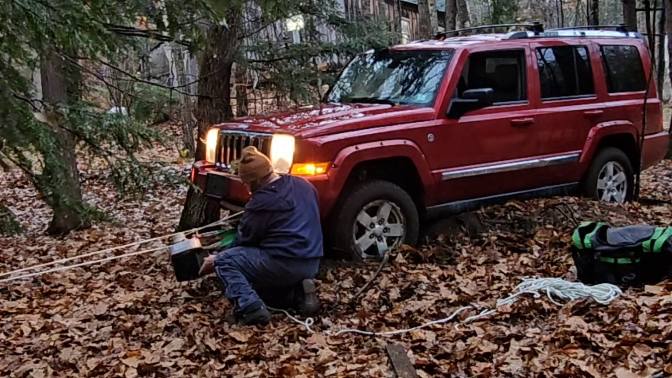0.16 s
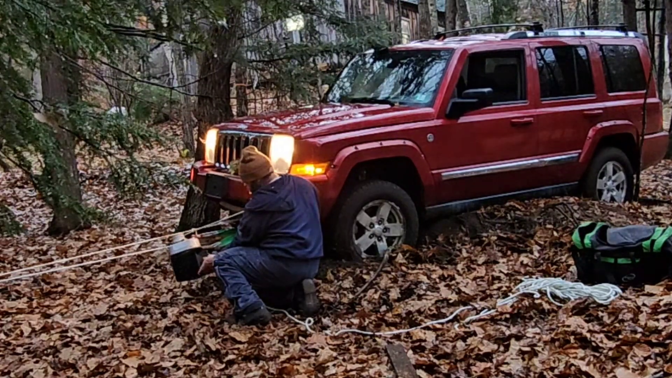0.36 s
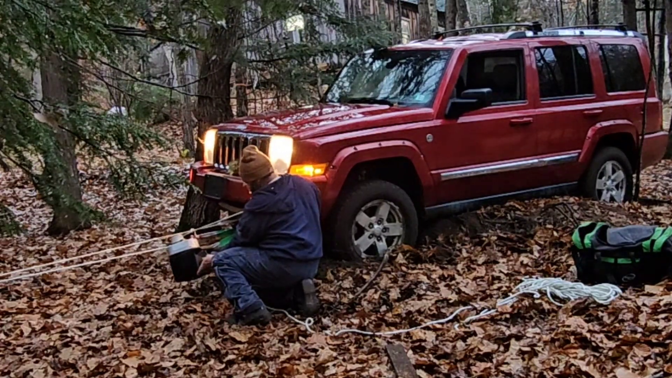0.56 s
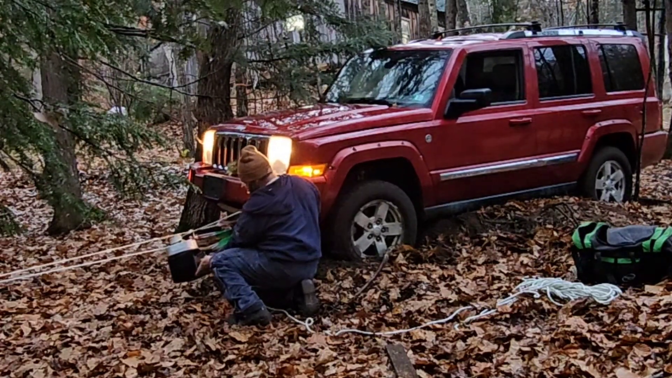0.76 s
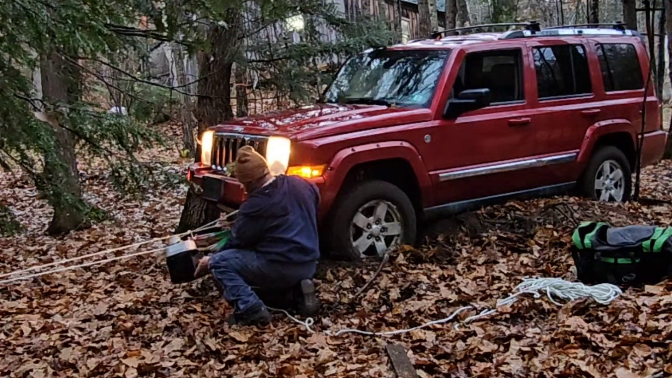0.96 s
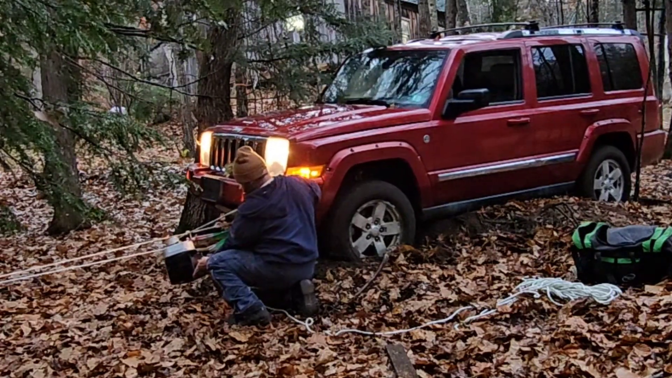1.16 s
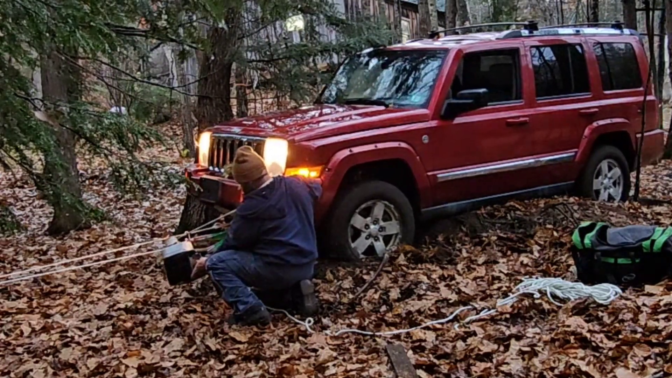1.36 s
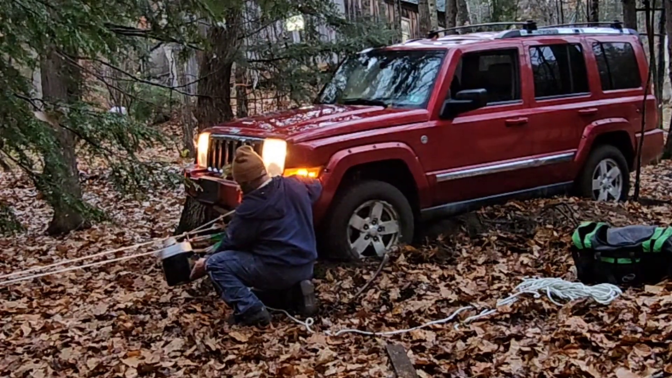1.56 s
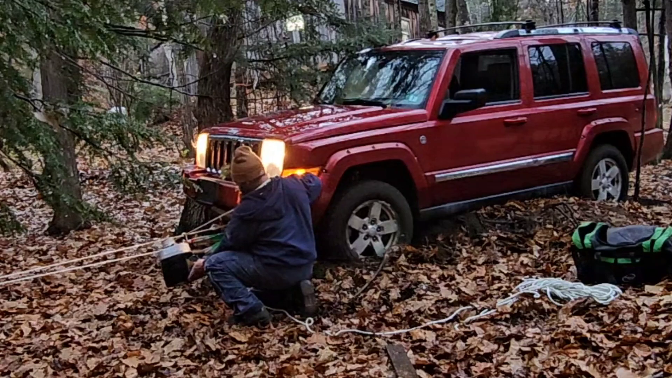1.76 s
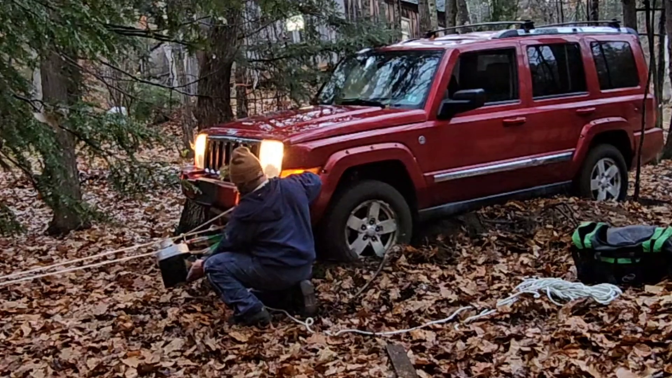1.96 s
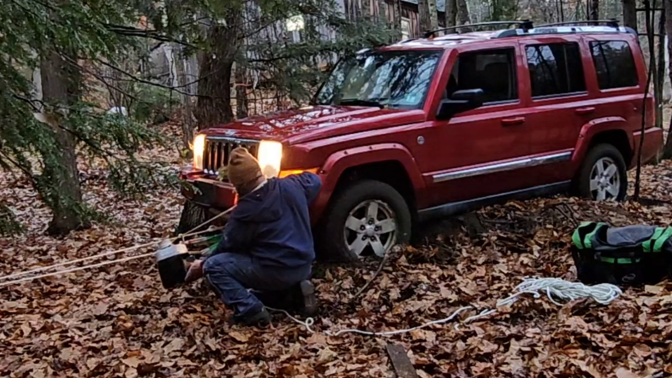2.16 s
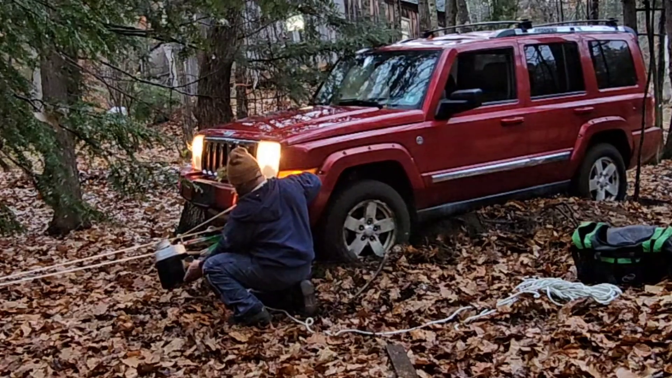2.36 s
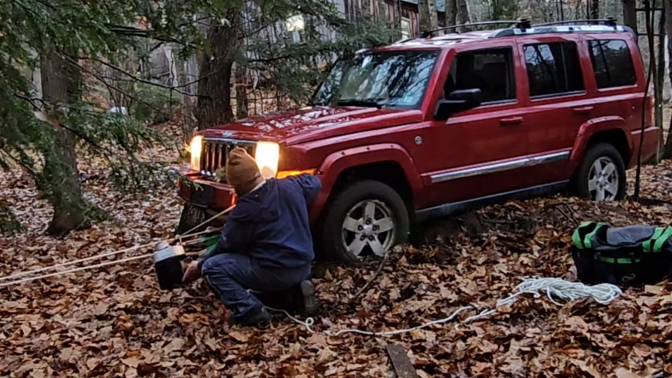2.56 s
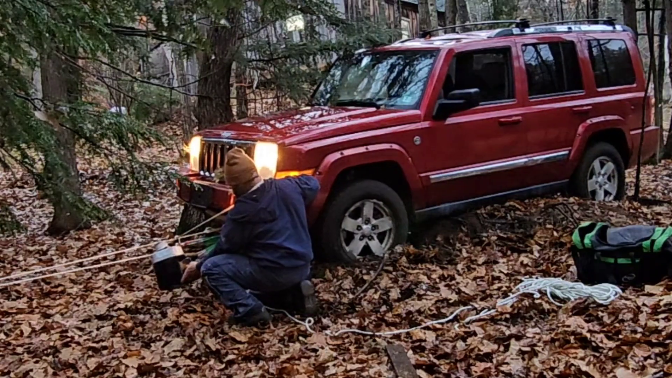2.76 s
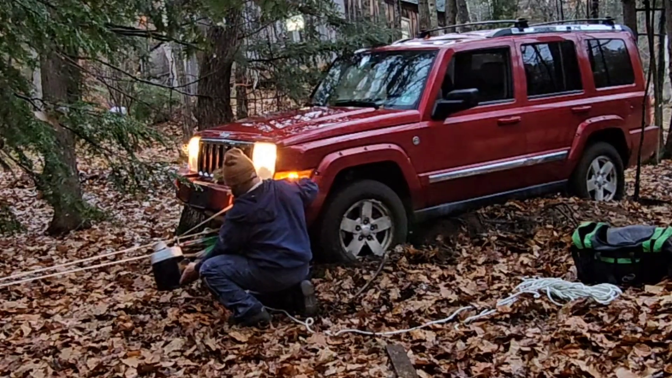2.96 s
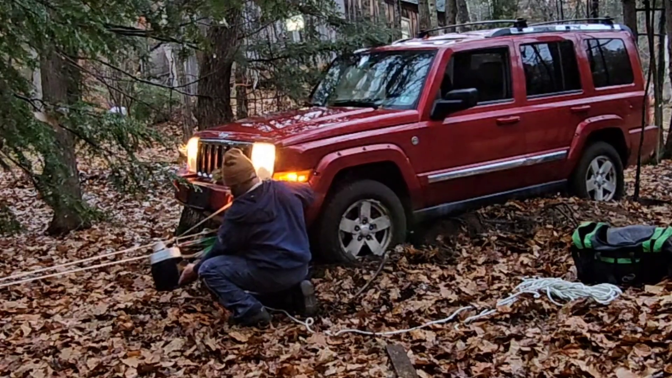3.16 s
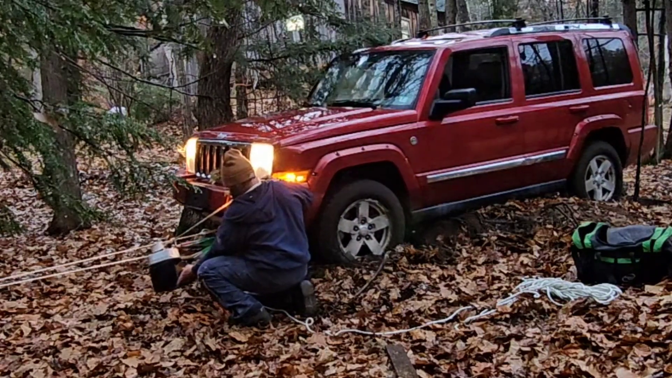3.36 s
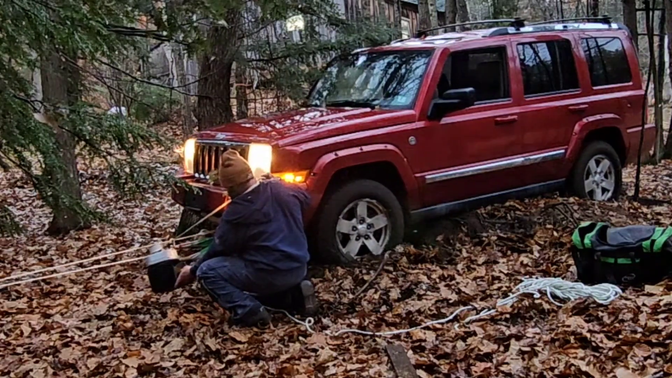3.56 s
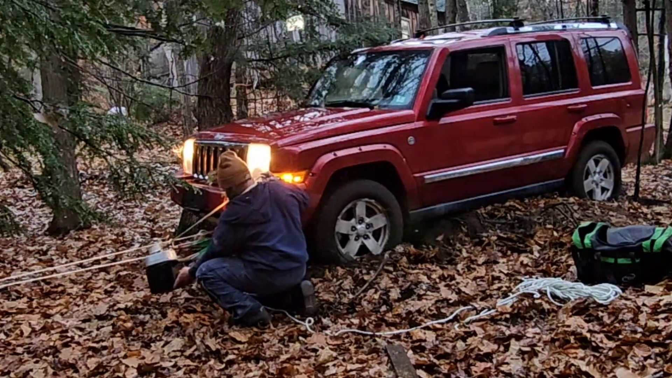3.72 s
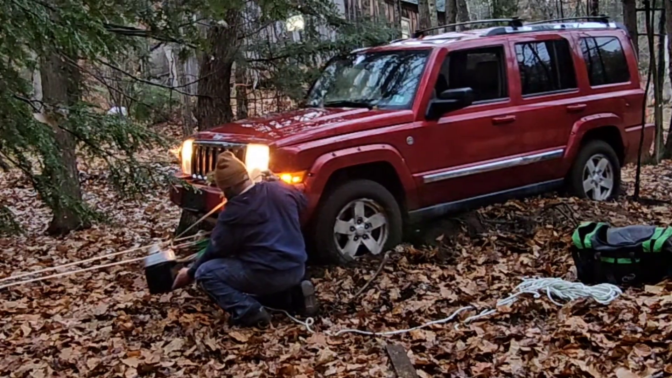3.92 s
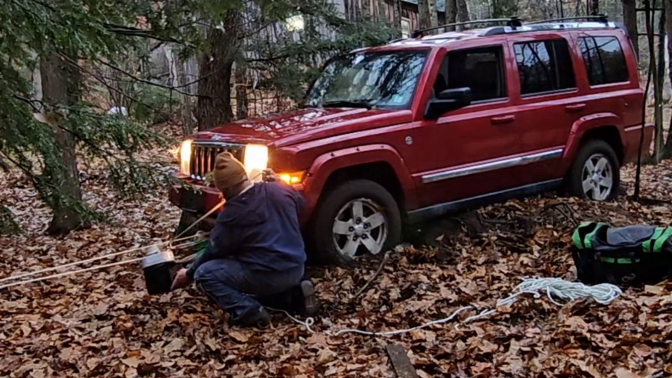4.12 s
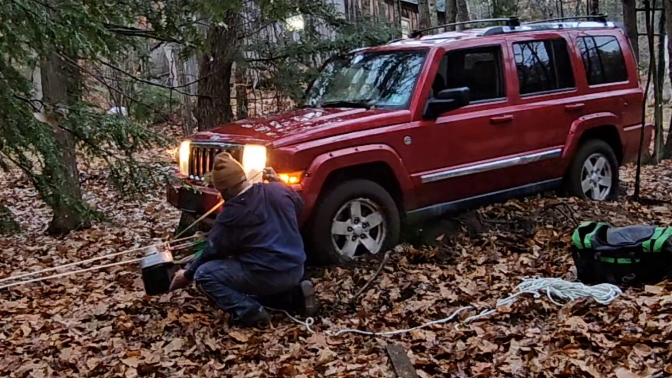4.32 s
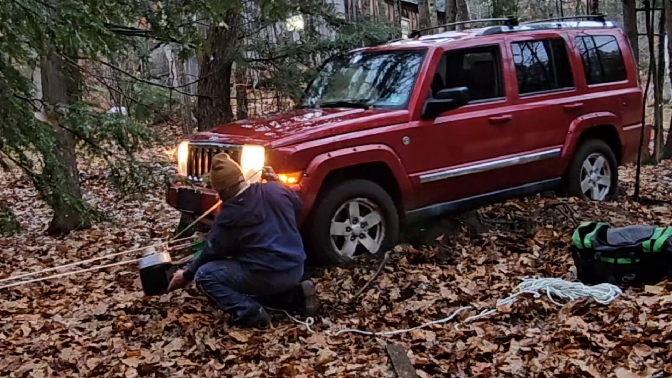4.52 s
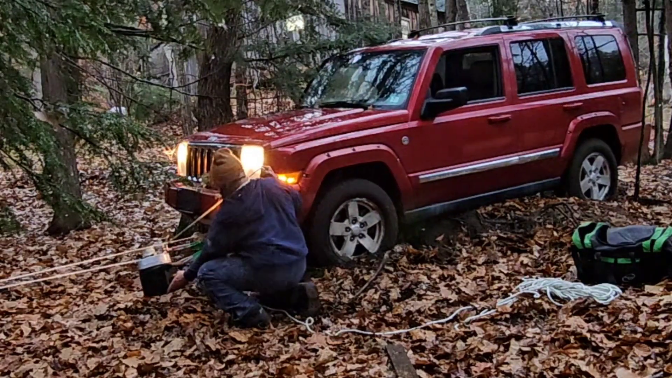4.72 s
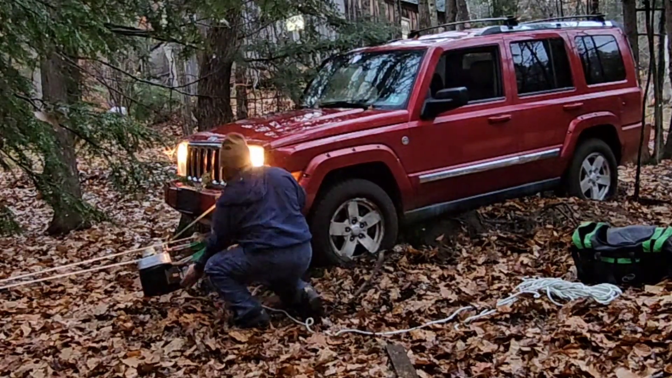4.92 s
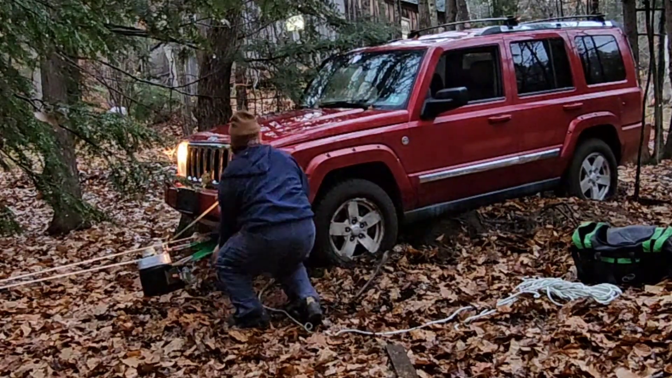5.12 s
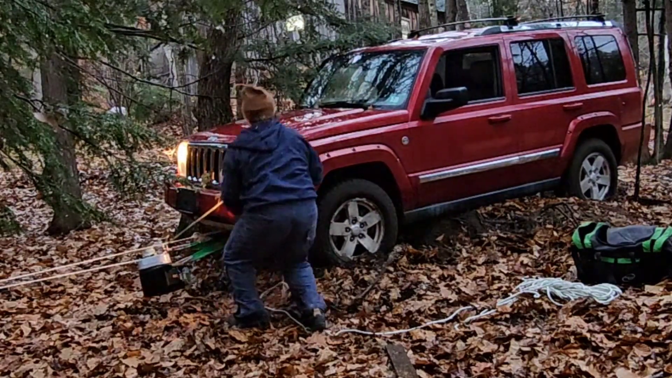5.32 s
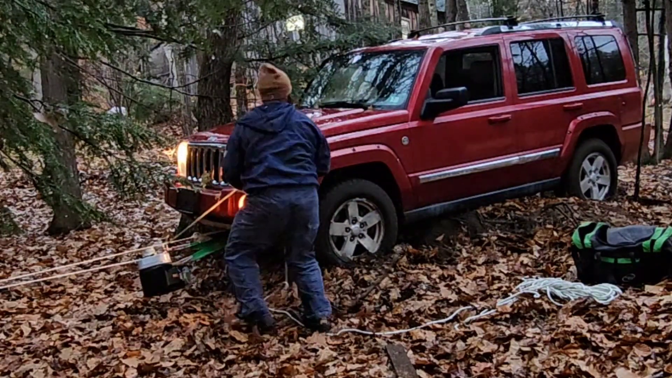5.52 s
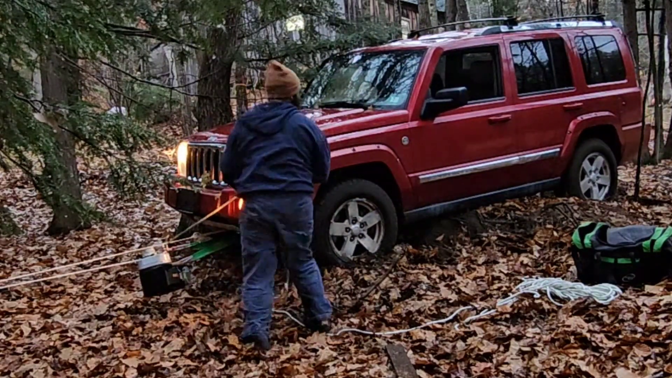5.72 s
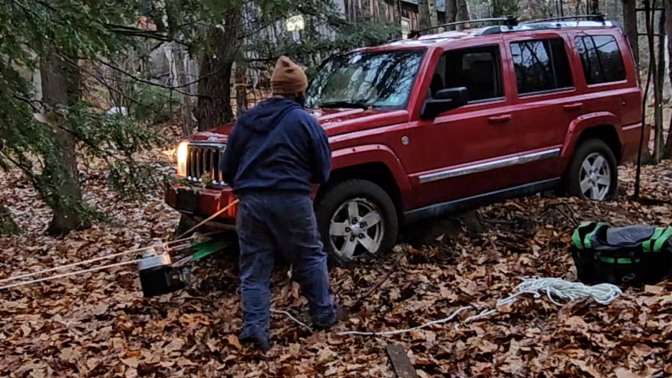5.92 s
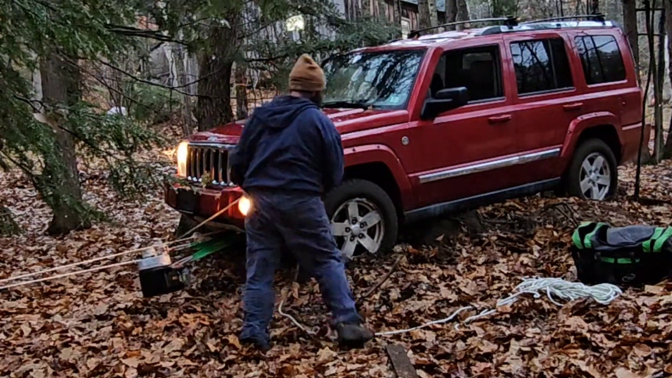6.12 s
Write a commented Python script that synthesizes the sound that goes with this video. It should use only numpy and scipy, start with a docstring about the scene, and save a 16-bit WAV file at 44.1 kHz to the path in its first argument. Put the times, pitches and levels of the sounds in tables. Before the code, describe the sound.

In a wood, an electric rope winch runs close by and a little to the left, with a steady whine and a rough, hissing whirr. A car idles underneath, and there are occasional twig snaps and dull bumps. About two thirds of the way through, the winch cuts off and its gears rattle briefly. Clothes rustle and boots crunch on dry leaves while the engine idles on.

```python
"""A battery capstan winch hauls rope in a wood, a little to the left, beside an idling V8 car.
Its motor sings on orders of its shaft, a gear shaft and its switching drive, over brush noise;
the car adds exhaust orders, rumble and fan rush. Twigs snap now and then; four dull bumps sound.
Near 4.45 s power is cut and the gears rattle out. A man gets up and steps on dry leaves
while the car idles on."""
import sys
import numpy as np
from scipy import signal
from scipy.fft import rfft, irfft, next_fast_len
from scipy.io import wavfile
from scipy.ndimage import uniform_filter1d, map_coordinates

SR = 44100
rng = np.random.default_rng(int(sys.argv[2]) if len(sys.argv) > 2 else 0)


def transcribe(u):
    """Save the signal u as a 16-bit wav file named by the first command-line argument.

    u: samples, shape (n,) or (channels, n), limited to [-1, 1]; the rate is SR.
    q: integer samples, one column per channel.
    """
    v = np.clip(np.atleast_2d(u).T, -1, 1)
    q = np.round(v * 32767).astype(np.int16)
    wavfile.write(sys.argv[1], SR, q)


N = 277149
T = np.arange(N) / SR
RIGHT = np.array([[0], [1]])  # right channel only; pan is left minus right

# shaft speeds up as the rope slackens: (time [s], speed [turns/s])
SHAFT_SPEED = [(0, 197.6), (.17, 199.3), (.55, 201.5), (.65, 202.4), (.8, 202.92), (2.8, 202.87),
               (3.07, 202.55), (3.4, 202.95), (4, 202.8), (4.455, 203.3), (4.5, 197)]
# motor still gathering speed: (time [s], share [0-1])
RUN_UP = [(.5, 1), (.62, 0)]
# strongest shaft orders: (order, pan [dB], right lag [cycles])
MAIN_ORDERS = [(5, -1, 0), (6, 5, 0), (7, 4, 0), (20, -1, -.16), (21, 0, -.12), (25, 0, 0), (28, 2, 0),
               (31.5, 9, 0), (42, 14, -.15)]
# one row per main order: (mid-haul level [dB], run-up change [dB], trend [dB/s])
MAIN_LEVELS = [(-44, -2.5, -0.5), (-51, 2, 1.2), (-48.5, -1, -1.96), (-55.5, 5, 0.5), (-55, 1.5, -0.5),
               (-62, -3, 0.8), (-59.5, -13, -1.5), (-71, 5.5, -1), (-78.5, 10.5, 1)]
# weaker shaft orders: (order, level [dB], pan [dB], run-up change [dB])
WEAK_ORDERS = [(1, -61, 2, 0), (1.5, -64, 2, 0), (3, -69, 3, 0), (4.5, -66, 2, 0), (6.6, -62, 2, 0),
               (7.5, -59.5, 3, -4), (8, -62, 2, -5), (8.5, -60, 2, 0), (8.79, -67, -4, 3), (9, -64, 1, 7),
               (10, -62.5, 4, 6), (11.12, -71, 9, 0), (12, -65, 8, -3), (14, -68, 5, 0), (15, -67, 8, 0),
               (15.54, -72, 6, 0), (17.5, -69, 0, 0), (19, -61, -1, -4), (20.41, -70, 0, 0),
               (21.5, -71, 0, 0), (21.63, -70, 0, 0), (22, -62, -5, -1), (22.8, -71, -4, 0),
               (23, -70, -4, 0), (24, -67, -1, 0), (25.85, -76, 0, 0), (26, -70, 1, -3), (27, -75, 2, 2),
               (27.36, -75, 2, 0), (29, -71, 5, -5), (30, -67, 7, -2), (30.89, -75, 10, 0),
               (31, -75, 10, -1), (34, -85, 10, 4), (35, -75, 12, 3), (40, -80, 8, 0), (45, -85, 9, 0),
               (49, -77, 4, 1), (50, -82, 3, 0), (56, -83, -6, 0), (60, -88, -2, 0), (65, -84, -7, 0),
               (68, -92, -3, 0), (70, -85, -3, 0)]
# gear shaft orders: (order, level [dB], pan [dB], run-up change [dB])
GEAR_ORDERS = [(3, -62, 1, 8), (7, -61, 9, 5), (8, -57, 2, -2), (9, -57.5, 3, 1), (10, -53.5, 1, -8),
               (11, -58, 0, 2), (12, -66, 2, 8), (13, -65, 8, 3), (14, -68, 6, 6), (16, -72, 6, 2),
               (17, -72, 5, 0)]
# passing changes: (order, time [s], half width [s], gain [dB], pan [dB], right lag [cycles])
ORDER_WAVERS = [(5, .5, .1, -9, 0, 0), (5, .72, .1, 2, 0, 0), (6, .35, .08, 6, 0, 0),
                (6, 1.7, .35, -5, 0, 0), (7, .3, .15, 2, 0, 0), (7, .52, .1, -2, 0, 0),
                (15, .12, .2, 4, 0, -.35), (15, .7, .45, 2, -10, 0), (15, 1.6, .2, 4, 0, 0),
                (15, 3.6, 1.3, 0, 0, .3), (15, 3.9, .25, 4, 0, 0), (19, 2.2, 3, 0, 0, -.06),
                (20, .2, .2, 0, 9, 0), (20, .38, .15, -8, 0, 0), (20, 1, .4, 0, -5, -.08),
                (20, 1.6, .25, -4, -7, -.3), (20, 3.5, .5, 1, 0, .16), (20, 4.2, .4, -3, -8, 0),
                (21, .1, .12, 5, -3, -.12), (21, .28, .13, 0, -11, 0), (21, .72, .12, 1, 8, 0),
                (21, 1.7, .3, 3, 6, .1), (21, 2.45, .2, -3, 13, .1), (21, 2.8, .2, -3, 3, -.28),
                (21, 3.1, .45, -8, 0, 0), (22, .1, .2, -6, 4, 0), (22, 2.5, .45, -8, -5, .15),
                (22, 3.4, .25, -4, 0, 0), (23, .7, .25, -3, 0, 0), (23, 2.2, .4, 3, 0, .1),
                (24, 1.3, .35, 0, -8, 0), (24, 1.85, .2, 4, 0, 0), (24, 2.1, 1.6, 0, 0, .33),
                (24, 2.2, .2, 0, 7, 0), (24, 4.1, .7, -6, 0, 0), (25, .1, .15, -1, 9, .3),
                (25, .5, .1, 0, 0, -.2), (25, 1, .35, 3, -7, 0), (25, 2.9, .5, 0, 6, 0),
                (25, 3.5, .6, 0, 0, .22), (25, 3.9, .15, 0, -5, 0), (28, .08, .07, 6, 0, 0),
                (28, 2.7, .55, -3, 2, 0), (28, 3.1, .8, 0, 0, .2), (28, 3.6, .25, 1, 0, 0),
                (28, 4.1, .45, 0, -6, 0), (30, .05, .1, 6, 0, 0), (30, .6, .45, -5, 0, .2),
                (30, 2.1, .5, 3, 0, 0), (30, 2.8, .2, 0, 6, .25), (30, 4.2, .45, -8, -8, 0),
                (31.5, .54, .1, 3, 0, 0), (31.5, 1.5, .3, 0, -13, -.2), (31.5, 2.15, .2, 5, 0, -.15),
                (31.5, 2.8, .5, 0, 9, 0), (31.5, 4.15, .4, -7, 0, 0), (35, .3, .09, -6, 0, 0),
                (42, 2.1, .8, 6, 0, 0), (42, 4.3, .3, -5, 0, 0)]
# switching tone, sidebands: (offset [7 shaft orders], level [dB], pan [dB], right lead [cycles])
DRIVE_TONES = [(-5, -75, 1, 0), (-4, -80, 12, .14), (-3, -84, 14, .14), (-2, -79, 7, .24),
               (-1, -77.5, -8, .28), (0, -78, -3, .55), (1, -77, -5, .19)]
# power cut, scaled per tone: (time [s], base gain [dB])
POWER_CUT = [(4.43, 0), (4.455, 1), (4.473, -3), (4.49, -22), (4.56, -45)]
# brush noise under load: (time [s], level [dB])
BRUSH_LEVEL = [(0.0, -41.5), (0.6, -39.5), (1.25, -39.5), (4.33, -41), (4.44, -40.5)]
# brush noise through the casing: (frequency [Hz], relative density [dB])
BRUSH_SPECTRUM = [(300, -22), (600, -24), (950, -13.5), (1090, -14.5), (1340, -8), (1385, -5.5),
                  (1420, -12.5), (1458, -6.5), (1510, -11), (1650, -10), (1900, -13.5), (2250, -15),
                  (2600, -24), (3050, -15.5), (3500, -17.5), (4400, -16), (5100, -19.5), (6100, -19),
                  (7800, -36), (9600, -30.5), (10600, -47), (11300, -27.5), (12200, -42), (14200, -36),
                  (15500, -76)]
# winch noise: (frequency [Hz], left-right likeness [0-1])
WINCH_LIKENESS = [(500, .84), (1700, .55), (2300, .85), (6000, .72), (6900, .35), (8500, .1), (11000, .1),
                  (12000, .5), (14000, .2)]
# coast-down, hiss dies first: (time [s], body gain [dB], hiss gain [dB])
COAST_GAINS = [(4.43, -4.5, -13), (4.47, -4, -17), (4.5, -1.5, -16), (4.57, -8, -25.5), (4.68, -9.5, -32),
               (4.85, -12, -45)]
# slow gear's scuff: (frequency [Hz], relative density [dB])
SCUFF_SPECTRUM = [(2900, -27), (3300, -8), (3520, 12), (3750, -8), (4400, 1), (4800, 0), (5300, -8),
                  (5700, -10), (6200, -4), (7200, -7), (8500, -33), (10000, -120)]

# idle: (time [s], firing rate [Hz])
FIRING_RATE = [(0, 168.2), (1, 167), (2.1, 167), (2.4, 170), (2.75, 174), (4.1, 174.2), (4.4, 172),
               (4.7, 169), (5.2, 168.7), (6.28, 168)]
# exhaust: (crank order, relative level [dB])
EXHAUST_ORDERS = [(0.5, -32), (1, -9), (1.5, -5), (2, -1), (2.5, -13.5), (3, -3), (3.5, -16.5), (4, 0),
                  (4.5, -22), (5, -16), (5.5, -15.5), (6, -12.5), (6.5, -16.5), (7, -26)]
# engine rumble: (frequency [Hz], relative density [dB])
RUMBLE_SPECTRUM = [(12, -11), (25, -10), (45, 2.5), (75, 1), (110, -2), (200, -12), (320, -19.5),
                   (700, -120)]
# rumble swells: (time [s], half width [s], rise [dB])
RUMBLE_SWELLS = [(1.55, 0.11, 6), (2.5, 0.6, 4.5), (3.75, 0.87, 5), (5.45, 0.094, 1)]
# fan and belts: (frequency [Hz], relative density [dB])
BAY_SPECTRUM = [(120, -15), (220, -6.5), (320, -9.5), (450, -7.5), (800, -6), (1050, -9), (1400, -13),
                (2500, -18.5), (4300, -21), (6000, -34), (8000, -50.5), (10500, -53), (11500, -42),
                (15700, -69)]
# car noise: (frequency [Hz], left-right likeness [0-1])
CAR_LIKENESS = [(30, 0.99), (60, 1), (130, 0.95), (290, 0.82), (640, .55), (950, .5), (1400, 0),
                (15000, 0.11)]

# leaves and twigs break: (time [s], body level [dB], pitch [Hz], treble level [dB], pan [dB])
TWIG_SNAPS = [(0.422, -38, 5560, -51, 3), (0.4383, -36, 2960, -55, 1), (1.5272, -38, 4900, -50, -4),
              (2.17, -46, 6000, -55, -1), (3.165, -41, 6000, -55, 0), (3.366, -35, 2600, -73, 1),
              (3.3682, -39, 2700, -66, 1), (3.462, -46, 7000, -61.5, -2), (4.322, -29.5, 3760, -60, 9),
              (4.3265, -39, 4530, -78, 4), (4.581, -41, 4530, -69, 6), (4.614, -45, 5700, -72, 2),
              (5.094, -58, 7540, -78, 9), (5.226, -48, 5500, -79, 0), (5.256, -48, 4000, -77, 5),
              (5.344, -54, 4500, -66, 6), (5.379, -53, 5500, -70, -7), (5.389, -42.5, 5700, -70, 12),
              (5.391, -43, 3770, -75, 6), (5.403, -47, 1300, -75.5, 0), (5.429, -43, 4000, -73, 2.5),
              (5.526, -45, 2900, -75, 2), (5.574, -46, 4000, -69, 2), (5.604, -45, 3000, -72, 0),
              (5.621, -41, 2800, -67, 2), (5.66, -41, 2000, -75, 2), (5.885, -50, 4500, -68, -1.5),
              (5.894, -40, 1780, -76, -2), (5.897, -45, 3000, -75, 0), (5.929, -47, 4800, -78, 3),
              (5.943, -43, 4600, -74, 3), (5.976, -55, 2600, -81, 3), (6.021, -41, 1800, -78, 2),
              (6.029, -40, 2000, -78, 4), (6.038, -47, 4200, -78, 4), (6.056, -38, 3160, -74, 7),
              (6.26, -46, 6960, -54, 8)]
# dull bumps: (time [s], level [dB], pitch [Hz], edge time [s])
THUDS = [(1.5964, -24.5, 150, 1.5947), (3.3875, -33.5, 69.4, 3.385), (3.521, -38, 79.5, 3.523),
         (3.9107, -29.5, 135, 3.9121)]
# gear backlash: (time [s], level [dB], tilt [dB/octave])
BACKLASH_KNOCKS = [(4.46, -38.5, -10), (4.489, -35, 5), (4.535, -42, 5), (4.576, -44, 3), (4.612, -36.5, 5),
                   (4.668, -45, 5)]
# casing modes: (frequency [Hz], bandwidth [Hz], gain [dB])
CASING_MODES = [(906, 44, 0.5), (1320, 47, 6), (1780, 90, -7), (2700, 250, -9), (4400, 500, -2)]
# boots and clothes: (peak time [s], build-up [s], rustle level [dB], crunch level [dB])
MOVES = [(4.5, .01, -78, -58), (4.66, 0.18, -67, -60), (5.25, .1, -74, -68), (5.392, 0.018, -69, -52),
         (5.52, 0.11, -65, -58), (5.58, .1, -59, -54), (5.65, 0.18, -54.5, -54.5), (5.89, 0.018, -57, -54),
         (5.98, 0.091, -60, -62), (6.06, 0.056, -58, -58), (6.18, 0.13, -59, -63), (6.26, .02, -64, -76)]
# stirred leaves: (frequency [Hz], relative density [dB])
RUSTLE_SPECTRUM = [(710, -59), (1200, -21), (1620, -8), (2470, -25), (2810, -4), (4910, -6.5), (6360, -7),
                   (7800, -19.5), (11700, -11.5), (15700, -19)]
# crushed leaves: (frequency [Hz], relative density [dB])
CRUNCH_SPECTRUM = [(900, -31), (1500, -1), (2800, -4.5), (4800, -8), (6500, -16), (9000, -48)]
# two close microphone ports: (frequency [Hz], pan [dB])
PORT_PAN = [(30, -2), (110, 3), (200, 4.5), (700, 4), (1290, 2), (2380, 5.5), (4400, -1.5), (8120, 14),
            (15000, -11)]

GEAR_RATIO, SLOW_GEAR_RATIO = 30 / 37, 5 / 74  # turns per shaft turn
WINCH_LEAD_S, BAY_LEAD_S = 6.5 / SR, 22 / SR  # earlier at the left port


def amp(db):
    return np.exp(np.asarray(db) * np.log(10) / 20)


def unit_rms(x):
    return x / np.sqrt(np.mean(x ** 2) + 1e-20)


def log_interp(points, hz):
    f, v = np.transpose(points)
    return np.interp(np.log(hz + 1), np.log(f + 1), v)


def curves(rows):
    """Per-sample curve for each column after the time."""
    times_s, *columns = np.transpose(rows)
    return [np.interp(T, times_s, column) for column in columns]


def bell(at_s, half_width_s):
    return np.exp(-((T - at_s) / half_width_s) ** 2)


def wobble(rate_hz):
    """Smooth curve through random knots."""
    knots = rng.standard_normal(int(N * rate_hz / SR) + 4)
    return np.interp(T, T[::64], map_coordinates(knots, [T[::64] * rate_hz]))


def filtered(x, response):
    size = next_fast_len(N + SR // 4)
    return irfft(rfft(x, size) * response(np.fft.rfftfreq(size, 1 / SR)), size)[..., :N]


def pan_gains(pan_db):
    return amp(np.array([[.5], [-.5]]) * pan_db)


def leftward(x, lead_s):
    return filtered(x, lambda hz: np.exp(1j * np.pi * hz * lead_s * np.array([[1], [-1]])))


def tone(cycles, db, pan_db, drift_db, flutter_db):
    """Stereo sine of slightly unsteady level."""
    level = amp(db + drift_db * wobble(1.464) + flutter_db * wobble(14))
    phase = np.float32(2 * np.pi * ((cycles + rng.random()) % 1))
    return pan_gains(pan_db) * np.sqrt(2) * level * np.sin(phase)


def noise(spectrum, likeness, patchy_db, gate=1):
    """Stereo noise, rms 1, with time-frequency patches of random gain, through the two ports."""
    def mid_side(hz):
        angle = np.arccos(np.clip(log_interp(likeness, hz), -1, 1)) / 2
        return amp(log_interp(spectrum, hz)) * [np.cos(angle), np.sin(angle)]

    bins = signal.stft(rng.standard_normal((2, N)), nperseg=512)[2]
    patches = uniform_filter1d(rng.standard_normal(bins.shape[1:]), size=6, axis=0)
    patches = unit_rms(uniform_filter1d(patches, size=10, axis=1))
    pair = gate * signal.istft(bins * amp(patchy_db * patches), nperseg=512)[1][:, :N]
    mid, side = filtered(pair, mid_side)
    stereo = np.array([mid + side, mid - side])
    return unit_rms(filtered(stereo, lambda hz: pan_gains(log_interp(PORT_PAN, hz))))


def waver(order):
    """Passing changes of one order: (gain [dB], pan [dB], right lag [cycles])."""
    changes = (np.outer(change, bell(at_s, width_s))
               for k, at_s, width_s, *change in ORDER_WAVERS if k == order)
    return sum(changes, np.zeros((3, 1)))


def shaft_whine(turns, cut_db, mid_haul_s=2.5, roam_db=3, right_lead_cycles=.05):
    """Tones locked to the motor and gear shafts; they fade at the power cut."""
    run_up = curves(RUN_UP)[0]
    out = np.zeros((2, N))
    for (order, pan_db, lag), (db, run_up_db, trend_db_per_s) in zip(MAIN_ORDERS, MAIN_LEVELS):
        swell_db, shift_db, slip = waver(order)
        level_db = db + run_up * run_up_db + trend_db_per_s * (T - mid_haul_s) + swell_db
        level_db += cut_db * np.sqrt(order / 5)  # high orders die first
        cycles = order * turns - (lag + slip) * RIGHT
        out += tone(cycles, level_db, pan_db + shift_db, drift_db=1.6, flutter_db=0.42)
    for ratio, table in ((1, WEAK_ORDERS), (GEAR_RATIO, GEAR_ORDERS)):
        for order, db, pan_db, run_up_db in table:
            swell_db, shift_db, slip = waver(order * ratio)
            level_db = db + run_up * run_up_db + swell_db + 2 * cut_db
            cycles = order * ratio * turns + (right_lead_cycles - slip) * RIGHT
            roaming_pan_db = pan_db + shift_db + roam_db * wobble(1.5)
            out += tone(cycles, level_db, roaming_pan_db, drift_db=1.5, flutter_db=2)
    return out


def drive_whistle(turns, cut_db, switch_hz=12657.3):
    """Switching tone with shaft-locked sidebands; swells once."""
    gain_db = 3 * bell(2.8, 0.63) + 2 * cut_db
    out = np.zeros((2, N))
    for step, db, pan_db, lead in DRIVE_TONES:
        cycles = switch_hz * T + 7 * step * turns + lead * RIGHT
        out += tone(cycles, db + gain_db, pan_db, drift_db=1.6, flutter_db=2)
    return out


def brushes(turns, slow_rad, body_db, hiss_db, crossover_hz=4800):
    """Brush noise chopped by the armature; its level sways with the slow gear."""
    chop = 1 + 0.067 * np.sin(2 * np.pi * turns) + 0.13 * np.sin(4 * np.pi * turns)
    sway_db = 1.53 * np.sin(slow_rad + 0.75) + 0.44 * np.sin(2 * slow_rad + 1.2)
    level_db = curves(BRUSH_LEVEL)[0] + 0.74 * wobble(9.1) + sway_db
    brush = amp(level_db) * noise(BRUSH_SPECTRUM, WINCH_LIKENESS, patchy_db=1, gate=chop)
    body = filtered(brush, lambda hz: 1 / (1 + (hz / crossover_hz) ** 6))
    return body * amp(body_db) + (brush - body) * amp(hiss_db)


def gear_scuff(slow_rad, hiss_db):
    """The slow gear scuffs briefly once a turn."""
    contact = np.exp(9 * (np.cos(slow_rad - .35) - 1))
    level_db = -51.5 + hiss_db + 1.4 * wobble(16)
    return amp(level_db) * noise(SCUFF_SPECTRUM, WINCH_LIKENESS, patchy_db=-4, gate=contact)


def exhaust(crank_turns, firing_db=-49, orders_db=-52.5):
    """V8 firing tone at four per crank turn; uneven firings jitter the other orders."""
    out = tone(4 * crank_turns, firing_db, pan_db=2.5, drift_db=1, flutter_db=.8)
    for order, db in EXHAUST_ORDERS:
        if order != 4:
            cycles = order * crank_turns + 0.18 * wobble(6)
            out += tone(cycles, orders_db + db, pan_db=1, drift_db=2.5, flutter_db=2)
    return out


def engine_rumble(rest_db=-50):
    """Low, uneven engine noise with four swells."""
    swell_db = sum(db * bell(at_s, width_s) for at_s, width_s, db in RUMBLE_SWELLS)
    return amp(rest_db + swell_db) * noise(RUMBLE_SPECTRUM, CAR_LIKENESS, patchy_db=-0.5)


def engine_bay(crank_turns, belt_hz=823.6):
    """Faint belt whine; fan and belt rush pulsing with the valves."""
    whine = tone(belt_hz * T, db=-66.5, pan_db=6.2, drift_db=1, flutter_db=2.5)
    valves = 1 + 0.032 * np.sin(2 * np.pi * crank_turns)
    level_db = -47.5 + 0.66 * wobble(7.2)
    rush = noise(BAY_SPECTRUM, CAR_LIKENESS, patchy_db=1, gate=valves)
    return whine + amp(level_db) * leftward(rush, BAY_LEAD_S)


def twig_snaps(attack_s=0.0004, ring_t60_s=0.0052, grit_t60_s=0.016, treble_t60_s=0.021):
    """Leaves and twigs break: a short ring, grit and a treble burst."""
    out = np.zeros((2, N))
    t = T[:SR // 30]
    onset = 1.8 * (1 - np.exp(-t / attack_s))
    for at_s, db, hz, treble_db, pan_db in TWIG_SNAPS:
        phase = 2 * np.pi * hz * t
        ring = np.sin(phase) + 0.34 * np.sin(.45 * phase) + 0.12 * np.sin(1.55 * phase)
        grit = uniform_filter1d(rng.standard_normal((2, len(t))), size=4)
        body = amp(-60 * t / ring_t60_s) * ring + 0.69 * amp(-60 * t / grit_t60_s) * grit
        treble = np.diff(rng.standard_normal((2, len(t) + 2)), 2) / 2
        snap = amp(db) * body + amp(treble_db - 60 * t / treble_t60_s) * treble
        start = round(at_s * SR)
        out[:, start:start + len(t)] += (pan_gains(pan_db) * snap * onset)[:, :N - start]
    return out


def thuds(edge_hz=370, edge_width_s=0.0018, edge_db=-7):
    """One pull of air between two small pushes, with a knock on one flank."""
    out = np.zeros((2, N))
    for at_s, db, hz, edge_s in THUDS:
        spread = (np.pi * hz * (T - at_s)) ** 2
        pulse = (2 * spread - 1) * np.exp(-spread)
        edge = bell(edge_s, edge_width_s) * np.sin(2 * np.pi * edge_hz * (T - edge_s))
        out += amp(db) * pan_gains(2.4) * (pulse + amp(edge_db) * np.sign(edge_s - at_s) * edge)
    return out


def backlash(attack_s=0.0057, pivot_hz=1340):
    """Gear backlash rings the casing as the winch stops."""
    out = np.zeros((2, N))
    t = T[:SR // 8]
    for at_s, db, tilt_db_per_octave in BACKLASH_KNOCKS:
        ring = np.zeros(len(t))
        for hz, width_hz, mode_db in CASING_MODES:
            gain = amp(mode_db + rng.normal(0, 2.1) + tilt_db_per_octave * np.log2(hz / pivot_hz))
            ring += gain * np.exp(-np.pi * width_hz * t) * np.sin(2 * np.pi * hz * t)
        start = round(at_s * SR)
        out[:, start:start + len(t)] += amp(db) * ring * (1 - np.exp(-t / attack_s))
    return out


def movement_gain(levels_db, decay_db_per_s, fidget_db, build_db=13.5, fidget_from_s=4.5):
    """Each move builds and dies away, over a floor of fidgeting."""
    power = amp(2 * fidget_db) * (T > fidget_from_s)
    for (peak_s, build_s, *_), db in zip(MOVES, levels_db):
        drop_db = np.where(T < peak_s, build_db * (peak_s - T) / build_s, decay_db_per_s * (T - peak_s))
        power += amp(2 * (db - drop_db))
    return np.sqrt(power)


def footsteps(crackles_per_s=700, breaks_per_s=300):
    """Boots and clothes stir a crackling rustle; dry leaves give way a few at a time."""
    *_, rustle_db, crunch_db = np.transpose(MOVES)
    crackle = 1 + (rng.random(N) < crackles_per_s / SR) * amp(6 * rng.random(N))
    rustle = noise(RUSTLE_SPECTRUM, likeness=[(1000, 0.11)], patchy_db=3, gate=crackle)
    breaks = (rng.random(N) < breaks_per_s / SR) * amp(6.6 * rng.random(N))
    bursts = uniform_filter1d(breaks + 0.025, size=40)
    crunch = noise(CRUNCH_SPECTRUM, likeness=[(1000, 0.24)], patchy_db=8, gate=bursts)
    return (rustle * movement_gain(rustle_db, decay_db_per_s=200, fidget_db=-79)
            + crunch * movement_gain(crunch_db, decay_db_per_s=406, fidget_db=-82))


def scene():
    turns = np.cumsum(curves(SHAFT_SPEED)[0]) / SR
    slow_rad = 2 * np.pi * SLOW_GEAR_RATIO * turns
    crank_turns = np.cumsum(curves(FIRING_RATE)[0]) / SR / 4
    cut_db = curves(POWER_CUT)[0]
    body_db, hiss_db = curves(COAST_GAINS)
    winch = shaft_whine(turns, cut_db) + drive_whistle(turns, cut_db)
    winch += brushes(turns, slow_rad, body_db, hiss_db) + gear_scuff(slow_rad, hiss_db) + backlash()
    car = exhaust(crank_turns) + engine_rumble() + engine_bay(crank_turns)
    man = footsteps() + twig_snaps() + thuds()
    return leftward(winch, WINCH_LEAD_S) + car + man


def record(dry):
    """Brick-wall low-pass."""
    return filtered(dry, lambda hz: hz < 15750)


dry = scene()
out = record(dry)
transcribe(out)
```